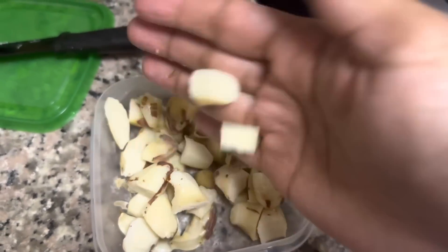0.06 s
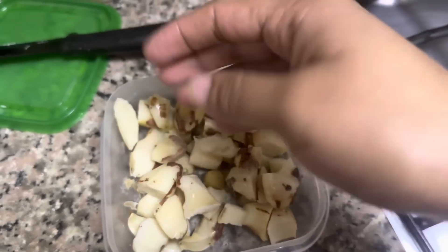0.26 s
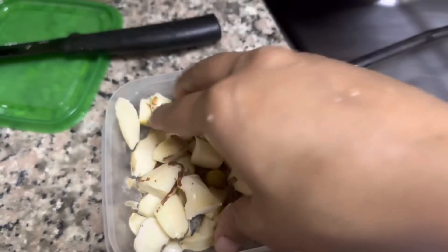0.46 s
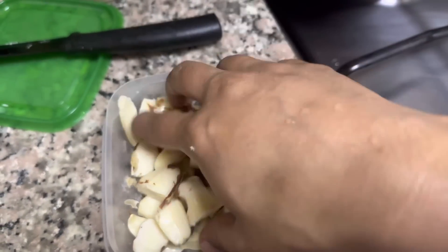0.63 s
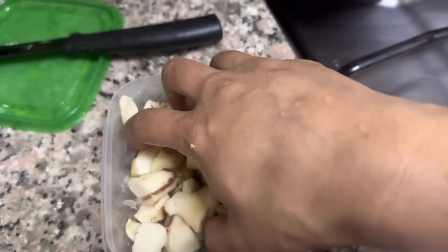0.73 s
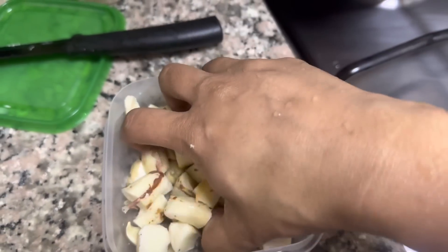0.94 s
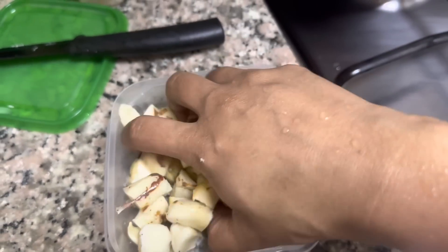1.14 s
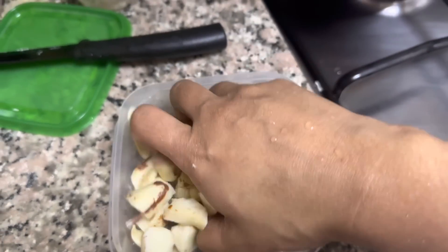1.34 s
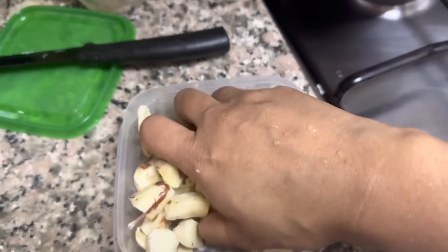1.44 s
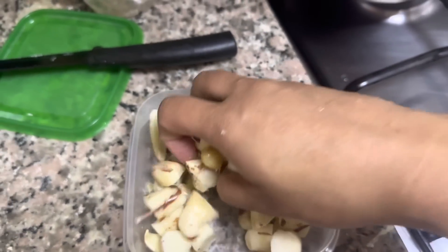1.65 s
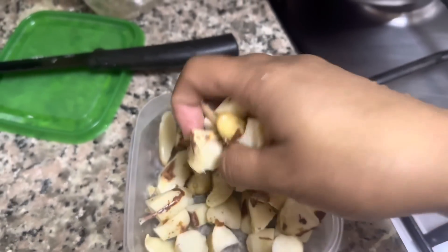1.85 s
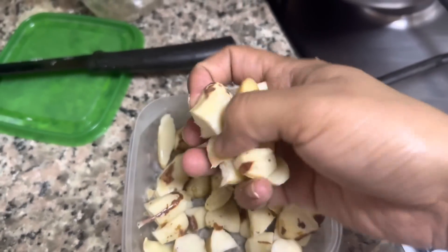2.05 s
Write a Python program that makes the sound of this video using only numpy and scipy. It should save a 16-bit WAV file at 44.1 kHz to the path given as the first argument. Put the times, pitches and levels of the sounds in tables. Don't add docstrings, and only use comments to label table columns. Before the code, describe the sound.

Chunks of hard seed clatter in a small plastic tub as a hand rummages and grips them

```python
import sys
import numpy as np
from scipy import signal
from scipy.fft import rfft, irfft, next_fast_len
from scipy.io import wavfile
from scipy.ndimage import uniform_filter1d, map_coordinates

SR = 44100
rng = np.random.default_rng(int(sys.argv[2]) if len(sys.argv) > 2 else 0)


def volts_from_db(level):
    exponent = np.asarray(level, float) / 20
    return 10 ** exponent


def store_wav(level_fs):
    pcm = np.round(np.clip(np.atleast_2d(level_fs), -1, 1) * 32767)
    wavfile.write(sys.argv[1], SR, pcm.T.astype(np.int16))


N = 92610

# (pitch [Hz], level [dB per Hz])
KITCHEN_AIR = [(25, -17), (50, -18.5), (134, -3.5), (413, -22), (800, -17.5), (4000, -20), (6300, -13.5),
               (9500, -22.5)]
# (pitch [Hz], level [dB per Hz])
TOP_HISS = [(9500, -29), (11500, -28.5), (12800, -31), (15600, -26.5)]
# (pitch [Hz], level [dB rms])
HUM = [(156, -45), (258, -50), (625, -52), (1357, -66)]
# (time [s], length [s], level [dB], highest pitch reached [Hz])
SLIDES = [(-0.02, 0.039, -32, 3150), (0.192, 0.085, -36, 1630), (0.204, 0.081, -34, 4400),
          (0.631, 0.14, -37, 2210), (0.832, .12, -37.5, 3280), (0.981, 0.037, -34, 2660),
          (1.028, 0.11, -35, 2980), (1.165, 0.13, -35.5, 4240), (1.304, 0.042, -31, 2940),
          (1.392, 0.16, -41.5, 4100), (1.417, 0.042, -38.5, 2940), (1.755, 0.21, -35, 4540),
          (1.798, 0.17, -43, 4300), (1.941, 0.05, -52, 2000)]
# (pitch [Hz], width [Hz], level [dB])
CHATTER = [(734, 38, -5), (863, 18, 2.5), (1085, 62, 1), (1347, 19, -5.5), (1592, 10, 1), (1720, 11.5, -12),
           (2057, 7.4, -3.5), (2269, 45, -4.5), (2528, 190, -11.5), (2560, 34, -0.5), (2927, 68, -4.5),
           (3150, 40, -9.5), (3480, 40, -4.5), (3753, 8.3, 4.5)]
# (pitch [Hz], level [dB])
SLIDE_COLOUR = [(500, -3), (900, -10), (2500, -16.5), (4200, -19), (6000, -41)]
# (time [s], length [s], level [dB], pitch [Hz])
DRAGS = [(-0.02, 0.04, -37.5, 1630), (-0.02, 0.061, -51, 1920), (0.209, 0.012, -40, 5320),
         (0.211, 0.017, -30, 7180), (0.273, .025, -42.5, 7810), (.642, 0.027, -42.5, 1756),
         (0.644, 0.15, -46.5, 1934), (0.65, 0.36, -49, 1392), (0.655, 0.045, -45.5, 910),
         (0.701, 0.052, -53, 1654), (0.787, .05, -47, 2840), (0.822, 0.16, -41.5, 840),
         (0.856, 0.042, -43.5, 1300), (0.84, 0.034, -44, 5780), (0.886, 0.055, -56, 3470),
         (1.011, .02, -46.5, 4120), (1.031, 0.034, -44, 7260), (1.051, 0.024, -36, 5900),
         (1.163, 0.08, -40, 5470), (1.168, 0.072, -39.5, 1160), (1.179, 0.052, -45.5, 2262),
         (1.18, 0.044, -38, 6400), (1.188, 0.15, -50.5, 2595), (1.191, 0.035, -50, 3530),
         (1.186, .18, -42.5, 877), (1.196, 0.091, -42, 1620), (1.216, 0.062, -46, 632),
         (1.227, 0.11, -30.5, 491.6), (1.426, 0.12, -32, 498), (1.257, 0.074, -40, 1083),
         (1.306, 0.046, -53, 579), (1.322, .02, -45, 4950), (1.333, 0.054, -43, 2550),
         (1.392, 0.045, -43, 3690), (1.423, 0.046, -42, 900), (1.428, .07, -44.5, 1970),
         (1.472, 0.098, -41.5, 670), (1.734, 0.042, -41, 626), (1.751, .04, -49, 3900),
         (1.76, 0.13, -48, 2984), (1.772, .08, -41.5, 1243), (1.794, 0.085, -46.5, 3780),
         (1.744, 0.078, -29, 383.4), (1.835, 0.072, -46, 1957), (1.836, 0.11, -46, 2606),
         (1.822, 0.045, -36.5, 197), (1.892, 0.11, -48, 3640), (1.879, .11, -39.5, 1061),
         (1.917, 0.11, -40.5, 198), (2.029, 0.079, -52, 1317)]
# (time [s], stirring effort [dB], weight on tub floor [dB], favoured wall pitch [Hz])
HAND = [(0.0, -32, -7, 367), (0.12, -61, 6, 247), (0.192, -73, 10, 350), (0.212, -16, -7.5, 344),
        (0.27, -19.5, -7.5, 291), (0.38, -33, -11.5, 350), (0.54, -42, -0.5, 290), (0.681, -35, -12.5, 400),
        (0.87, -23.5, -8.5, 321), (0.958, -30.5, 2, 299), (1.069, -21.5, -18, 291), (1.15, -28, -7.5, 250),
        (1.179, -25, -8, 278), (1.31, -29, -11.5, 328), (1.471, -23.5, -7.5, 319), (1.682, -48, -25, 290),
        (1.782, -30, -22.5, 380), (2.1, -60.5, 5.5, 239)]
# (pitch [Hz], level [dB], time to fall 60 dB [s])
TUB = [(62.7, -14, 0.36), (188, -26.5, 0.14), (203.4, -3.5, 0.19), (262.1, 0.5, 0.13), (306.1, -1, 0.098),
       (336, -2.5, 0.11), (380, 1, 0.1), (403.2, -5, 0.12), (477.8, -7, 0.19), (614.4, -8.5, 0.2),
       (743, -14.5, 0.18), (840, -18.5, 0.45), (1030, -8, 0.13)]
# (time [s], length [s], level [dB])
RUBS = [(0.188, .012, -35), (0.209, 0.016, -29.5), (0.232, 0.023, -37), (0.26, 0.039, -40),
        (0.737, 0.066, -44), (0.811, 0.13, -43.5), (0.974, 0.058, -40.5), (1.026, 0.084, -36.5),
        (1.174, 0.063, -35), (1.254, 0.11, -40), (1.314, 0.018, -33.5), (1.391, 0.088, -40),
        (1.635, 0.014, -42.5), (1.74, 0.15, -44), (1.924, 0.045, -38), (2.01, 0.3, -41.5)]
# (pitch [Hz], width [Hz], level [dB])
SKIN = [(4840, 190, -6.5), (5500, 110, -15.5), (5590, 160, -8), (6066, 110, -4.5), (6910, 180, -2),
        (7530, 78, -4)]
# (pitch [Hz], level [dB])
RUB_COLOUR = [(3000, -34.5), (4200, -26), (6300, -11), (8000, -18), (9500, -11.5), (12500, -51),
              (15700, -55)]
# (time [s], level [dB], pitch [Hz])
TICKS = [
    (0.192, -35.5, 1210),
    (0.484, -37, 960),
    (0.4835, -27.5, 1950),
    (0.642, -37, 890),
    (0.769, -21, 5480),
    (0.772, -24, 1260),
    (1.178, -30, 2240),
    (1.323, -54.5, 1090),
    (1.694, -32, 820),
]
# (time [s], peak level [dB], favoured pitch [Hz])
KNOCKS = [(0.21, -1.5, 358), (0.217, -5.5, 398), (0.232, -8.5, 242), (0.239, -7.5, 285), (0.251, -4.5, 261),
          (0.263, -19, 264), (0.283, -6, 292), (0.307, -16.5, 277), (0.643, -12.5, 336),
          (0.722, -18.5, 377), (0.748, -22, 348), (0.775, -20, 290), (0.821, -24, 242), (0.841, -9, 273),
          (0.873, -16.5, 410), (0.88, -15, 305), (0.896, -14, 387), (0.919, -15.5, 207),
          (0.982, -11.5, 200), (1.01, -25, 280), (1.052, -11, 270), (1.068, -11.5, 290), (1.166, -14, 230),
          (1.175, -26.5, 317), (1.223, -11, 380), (1.233, -12.5, 300), (1.281, -7.5, 310),
          (1.321, -12.5, 410), (1.398, -10.5, 284), (1.435, -10, 260), (1.466, -12.5, 270),
          (1.485, -22, 300), (1.504, -15, 276), (1.694, -27.5, 362), (1.741, -26, 400), (1.768, -30.5, 390),
          (1.856, -17, 446)]
# (pitch [Hz], likeness [0 to 1])
ALIKE = [(600, 0.84), (1200, 0.17), (1900, 0.89), (2900, 0.37), (4600, 0.033), (6500, 0.52), (9000, 0.6)]
# (pitch [Hz], lead [radians])
LEAD = [(600, 1.1), (950, 2.74), (1600, 7.6), (2200, 5.4), (4400, 6.45), (5200, 5.04), (9200, 8.85)]
# (pitch [Hz], difference [dB])
LEFT_OVER = [(40, 0), (130, 1), (260, 3.5), (480, 6.5), (700, 3), (1000, -2), (1500, 0)]

KITCHEN_DB, HUM_SMEAR = -39.5, 0.66
SLIDE_PER_S, TUMBLE_PER_S, RUB_PER_S = 1600, 260, 2500
ATTACK_S, RUB_ATTACK_S, SHORT_S = 0.004, 0.009, 0.04
SLIDE_T60_S, RUB_T60_S, TICK_T60_S = 0.18, 0.24, 0.022
REACH_ORDER = 12
STREAK_DB, STREAK_PER_S = 3.5, 14
DRAG_WAVER, WAVER_PER_CYCLE = 1.2, 0.035
DRAG_FLUTTER_DB, DRAG_T60_S, DRAG_APART_DB = 4, 0.09, -4.5
BOTTOM_HZ, BOTTOM_T60_S, BOTTOM_DB = 119.2, 0.068, 4
TUMBLE_DB, KNOCK_DB, SIZE_DB = -0.5, -14.5, 1
SPOT_DB, RISE_S = 0.5, 0.0025
FAVOUR_OCTAVES, FAVOUR_DB = 0.28, 8
TICK_SPREAD = 0.3
ROOM_T60_S, ROOM_DB = 0.25, -14
JOINED_HZ = 370
OPPOSED_HZ, REJOIN_HZ, REJOIN_TURN = 10750, 14100, 1
LOW_CUT_HZ, TOP_HZ = 37.3, 15850


def unit(x):
    return x / np.sqrt(np.mean(x ** 2) + 1e-20)


def along(points, hz):
    f, v = np.transpose(points)
    return np.interp(np.log(hz + 1), np.log(f + 1), v)


def wobble(rate):
    return map_coordinates(rng.standard_normal(400), [np.arange(N) * rate / SR])


def filtered(x, response):
    m = next_fast_len(N + SR // 2)
    return irfft(rfft(x, m) * response(np.fft.rfftfreq(m, 1 / SR)), m)[..., :N]


def kitchen():
    curve = [(12, -75)] + KITCHEN_AIR + TOP_HISS[1:]
    air = filtered(rng.standard_normal((2, N)), lambda f: volts_from_db(along(curve, f)))
    t = np.arange(N) / SR
    hum = np.zeros(N)
    for hz, db in HUM:
        level = volts_from_db(db + 2.6 * wobble(1.5))
        hum += level * np.sin(2 * np.pi * hz * t + HUM_SMEAR * wobble(25.74))
    direct_and_twin = np.array([[1], [0.7]])
    return volts_from_db(KITCHEN_DB + 1.17 * wobble(0.98)) * unit(air) + hum * direct_and_twin


def contacts(per_s, size_db):
    hit = rng.random(N) < per_s / SR
    return unit(hit * rng.choice([-1, 1], N) * volts_from_db(size_db * rng.exponential(size=N)))


def resonance(hz, width):
    return lambda f: 1j * f * width / (hz * hz - f * f + 1j * f * width)


def friction(per_s, size_db, peaks, broad, widen, swell_db, streak_db):
    slips = contacts(per_s, size_db)
    streaks = np.zeros(N)
    for hz, width, db in peaks:
        uneven = slips * volts_from_db(db + STREAK_DB * wobble(STREAK_PER_S))
        streaks += filtered(uneven, resonance(hz, width * widen))
    body = filtered(slips, lambda f: volts_from_db(along(broad, f)))
    return unit(volts_from_db(streak_db) * streaks + body) * volts_from_db(swell_db * wobble(18))


def stroke(s, length, db, t60, attack=ATTACK_S):
    t = np.arange(N) / SR - s
    fade_s = t60 * min(1, length / SHORT_S)
    return np.clip(t / attack, 0, 1) * volts_from_db(db - 60 * np.clip(t - length, 0, None) / fade_s)


def slides():
    slips = friction(SLIDE_PER_S, 0.57, CHATTER, SLIDE_COLOUR, widen=0.78, swell_db=0.5, streak_db=-5)
    out = np.zeros(N)
    for s, length, db, hz in SLIDES:
        reached = filtered(slips, lambda f: 1 / (1 + (f / hz) ** REACH_ORDER))
        out += stroke(s, length, db, SLIDE_T60_S) * reached
    return out


def drags():
    out = np.zeros(N)
    for (s, length, db, hz), knots in zip(DRAGS, rng.standard_normal((len(DRAGS), 2, 128))):
        span = slice(max(0, round(s * SR)), round((s + length + DRAG_T60_S) * SR))
        t = (np.arange(N) / SR - s)[span]
        waver, flutter = (map_coordinates(k, [t * (20 + WAVER_PER_CYCLE * hz)]) for k in knots)
        song = volts_from_db(DRAG_FLUTTER_DB * flutter) * np.sin(2 * np.pi * hz * t + DRAG_WAVER * waver)
        out[span] += stroke(s, length, db, DRAG_T60_S)[span] * song
    return out


def hand(column):
    rows = np.array(HAND)
    return np.interp(np.arange(N) / SR, rows[:, 0], rows[:, column])


def spot():
    return volts_from_db(SPOT_DB * rng.standard_normal(N))


def ringing(blows, hz, t60):
    t = np.arange(SR // 3) / SR
    ring = np.sin(2 * np.pi * hz * t) * volts_from_db(-60 * t / t60) * (1 - np.exp(-t / RISE_S))
    return signal.fftconvolve(blows, ring)[:N]


def walls(blows, pitch):
    out = np.zeros(N)
    for hz, db, t60 in TUB:
        octaves = np.log2(hz / pitch)
        favour = volts_from_db(FAVOUR_DB * np.exp(-(octaves / FAVOUR_OCTAVES) ** 2))
        out += volts_from_db(db) * ringing(blows * spot() * favour, hz, t60)
    return out


def tumble():
    blows = contacts(TUMBLE_PER_S, SIZE_DB)
    small = unit(walls(blows, hand(column=3)))
    bottom = unit(ringing(blows * spot(), BOTTOM_HZ, BOTTOM_T60_S))
    floor_level = volts_from_db(hand(column=2) + BOTTOM_DB)
    return volts_from_db(hand(column=1)) * (volts_from_db(TUMBLE_DB) * small + floor_level * bottom)


def rubs():
    level = np.zeros(N)
    for s, length, db in RUBS:
        level += stroke(s - RUB_ATTACK_S / 2, length, db, RUB_T60_S, RUB_ATTACK_S)
    return level * friction(RUB_PER_S, 0.49, SKIN, RUB_COLOUR, widen=2.45, swell_db=1.9, streak_db=-3)


def ticks():
    out, t = np.zeros(N + SR), np.arange(SR // 15) / SR
    for (s, db, hz), offsets in zip(TICKS, rng.uniform(-0.43, 1, (len(TICKS), 5))):
        ring = sum(np.sin(2 * np.pi * hz * (1 + TICK_SPREAD * v) * t) for v in offsets)
        out[round(s * SR):][:len(t)] += volts_from_db(db - 12 - 60 * t / TICK_T60_S) * ring
    return out[:N]


def knocks():
    blows, pitch = np.zeros(N), np.ones(N)
    for s, db, hz in KNOCKS:
        i = round(s * SR)
        blows[i], pitch[i] = volts_from_db(db + KNOCK_DB), hz
    return walls(blows, pitch)


def tail(x, t60):
    fading = rng.standard_normal(SR // 2) * volts_from_db(-60 * np.arange(SR // 2) / SR / t60)
    return signal.fftconvolve(x, fading / np.linalg.norm(fading))[:N]


def scattered(x):
    z = signal.stft(x, nperseg=512)[2]
    drift = uniform_filter1d(rng.standard_normal(z.shape), size=4, axis=0)
    drift = uniform_filter1d(drift, size=8, axis=1)
    return signal.istft(z * np.exp(1j * np.pi * unit(drift)), nperseg=512)[1][:N]


def ports(direct, twin):
    likeness = [(JOINED_HZ, 1)] + ALIKE + [(OPPOSED_HZ, 1), (REJOIN_HZ, 1), (TOP_HZ, 0.5)]
    opposed = 3 * np.pi
    leads = [(JOINED_HZ, 0)] + LEAD
    leads = leads + [(OPPOSED_HZ, opposed), (REJOIN_HZ, opposed), (TOP_HZ, opposed + REJOIN_TURN)]

    def share(f):
        turn = np.arccos(np.clip(along(likeness, f), 0, 1)) / 2
        return [np.cos(turn), np.sin(turn)]

    def port(f):
        return np.exp(0.5j * along(leads, f)) * volts_from_db(-along(LEFT_OVER, f) / 2)

    same, apart = filtered(np.array([direct, twin]), share)
    return filtered(np.array([same + apart, same - apart]), lambda f: [1 / port(f), port(f)])


def scene():
    sung = drags()
    near = tumble() + knocks() + slides() + rubs() + ticks()
    near = near + volts_from_db(ROOM_DB) * tail(near, ROOM_T60_S)
    direct, twin = np.array([near, scattered(near)]) + kitchen()
    sung_apart = volts_from_db(DRAG_APART_DB) * np.outer([1, -1], scattered(sung))
    return ports(direct, twin) + sung + sung_apart


def low_pass(x):
    return signal.sosfilt(signal.butter(12, 15850, fs=SR, output="sos"), x)


def record(dry):
    def band(hz):
        low_cut = -hz ** 2 / (LOW_CUT_HZ ** 2 - hz ** 2 + 1.2j * hz * LOW_CUT_HZ)
        return (hz < TOP_HZ) * low_cut ** 3

    mix = filtered(dry, band)
    return low_pass(mix)


dry = scene()
out = record(dry)
store_wav(out)
```